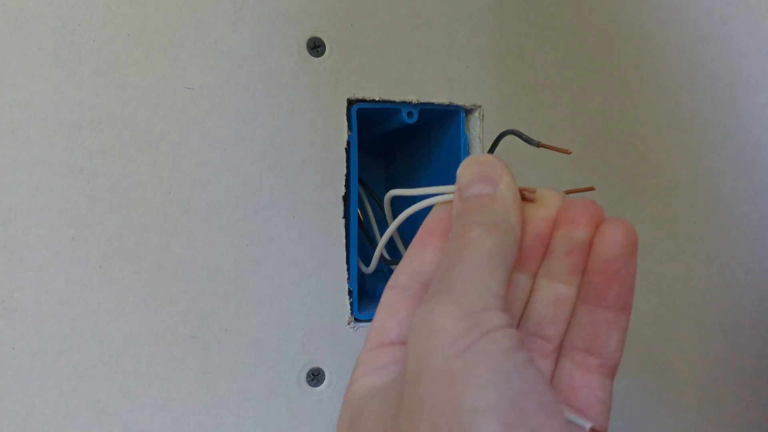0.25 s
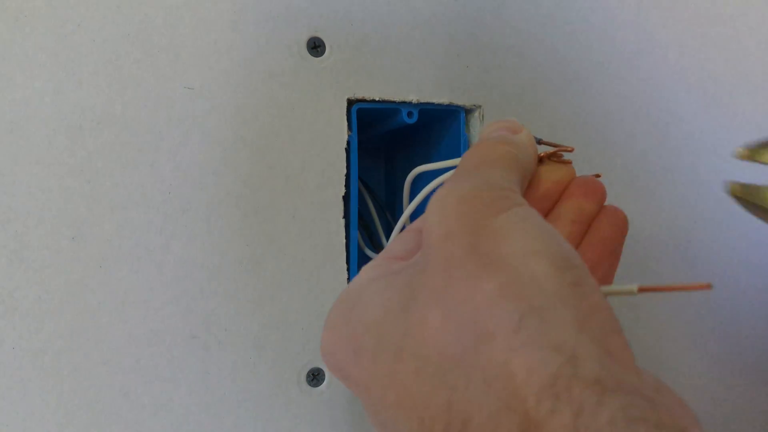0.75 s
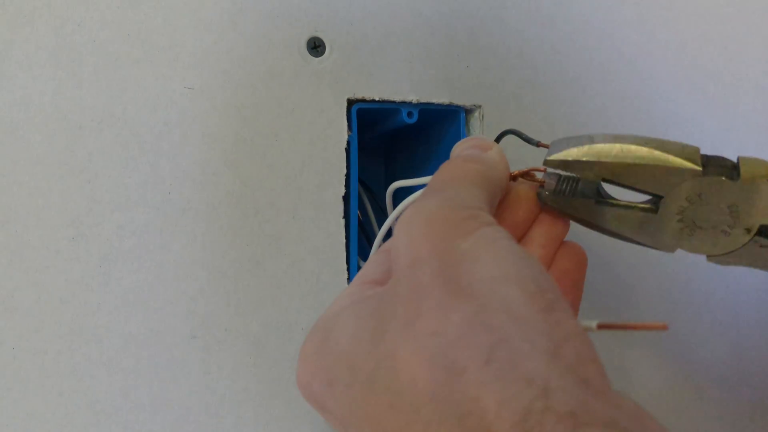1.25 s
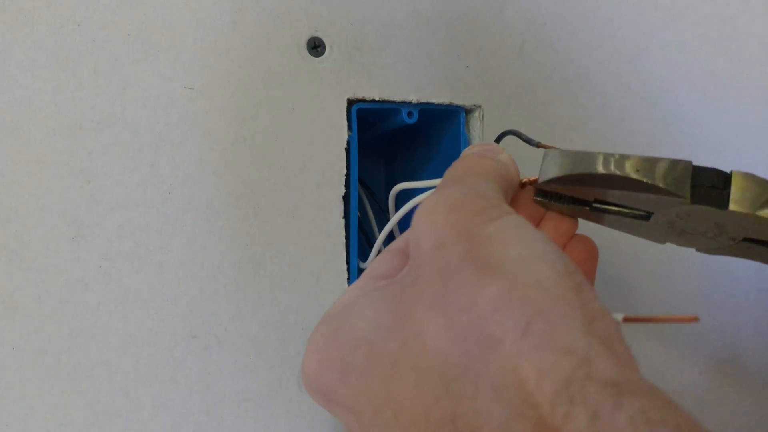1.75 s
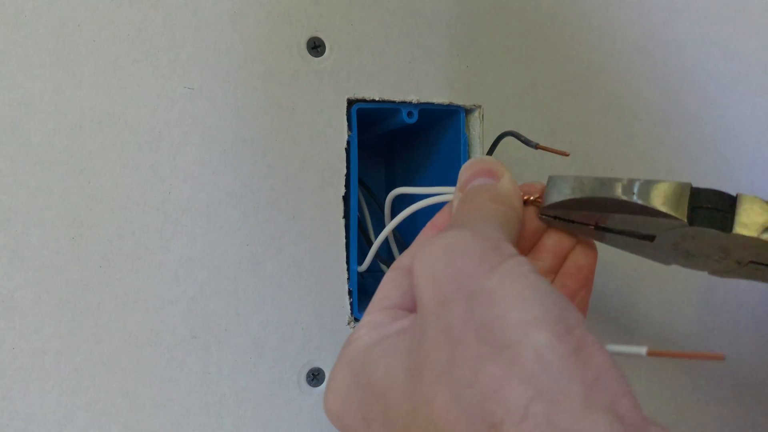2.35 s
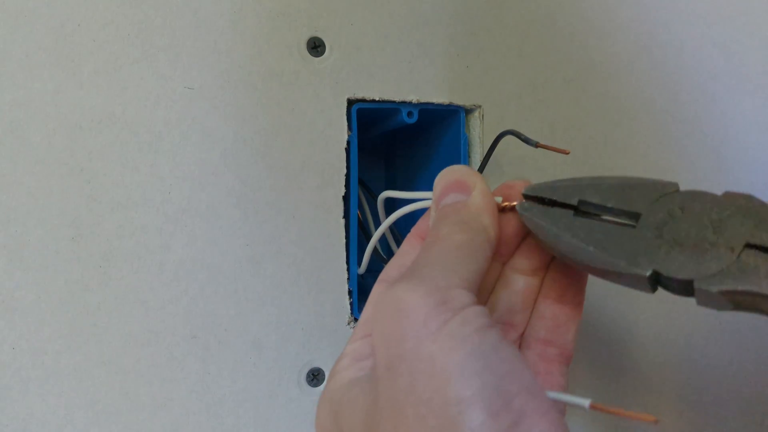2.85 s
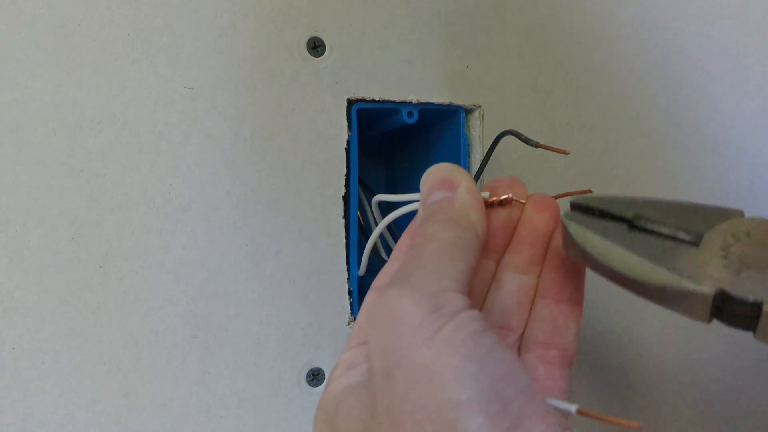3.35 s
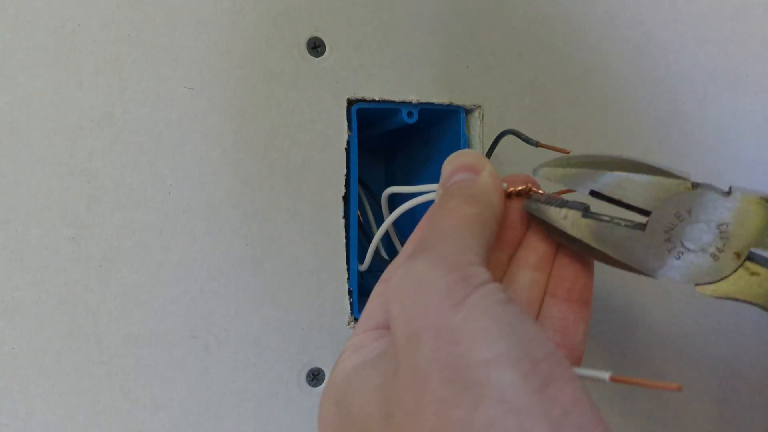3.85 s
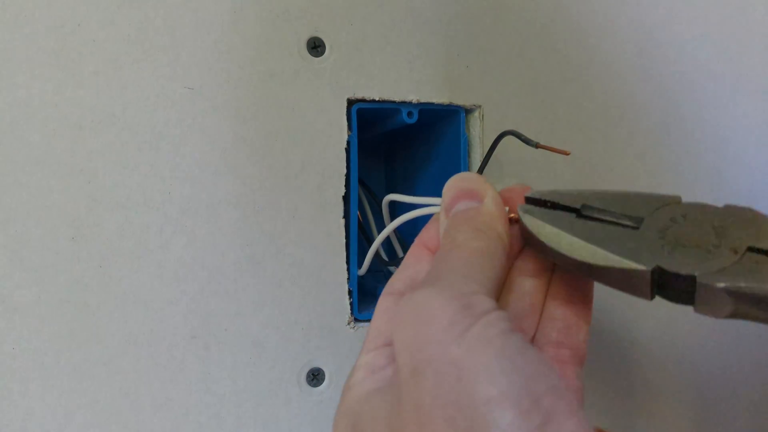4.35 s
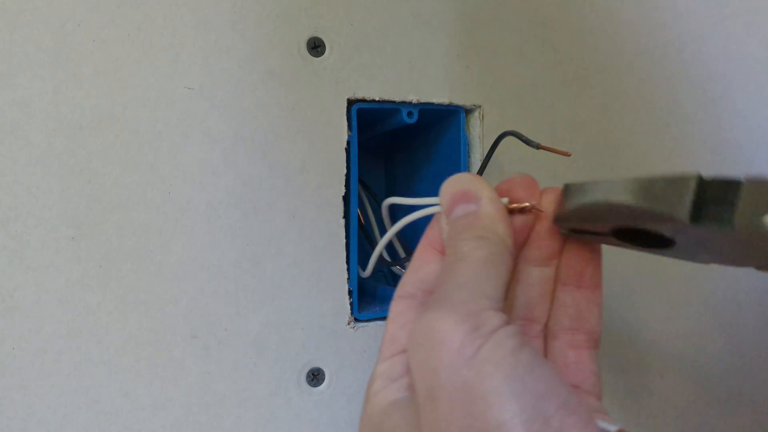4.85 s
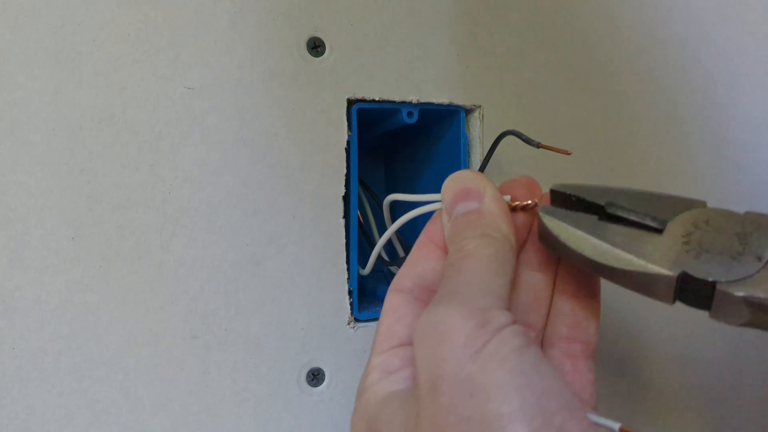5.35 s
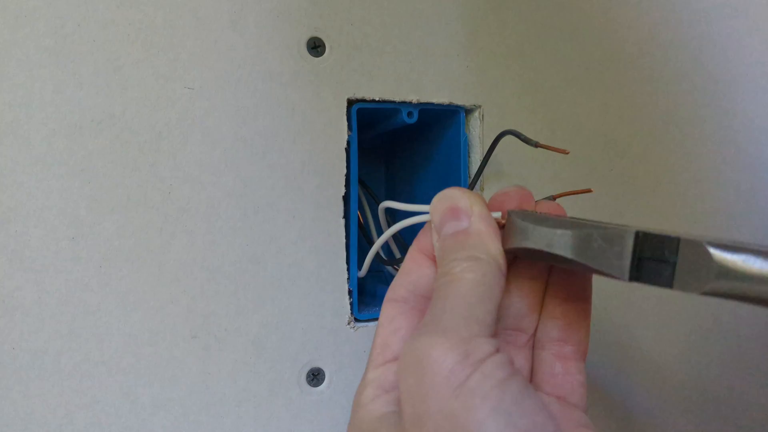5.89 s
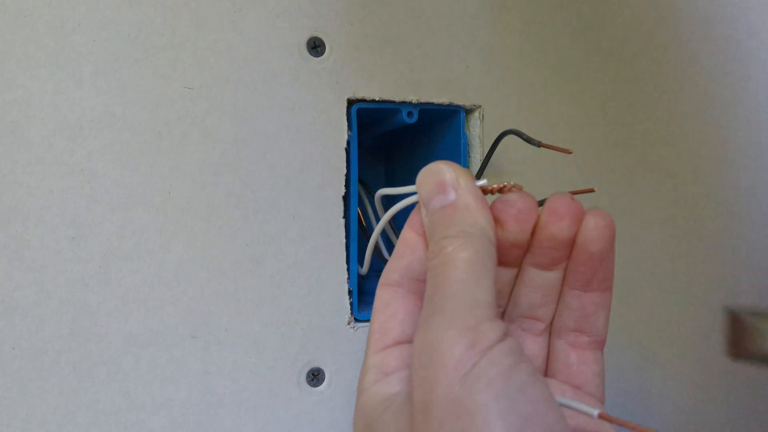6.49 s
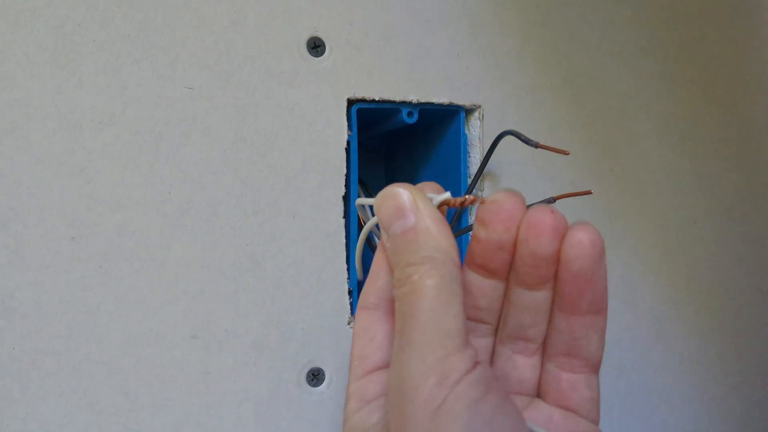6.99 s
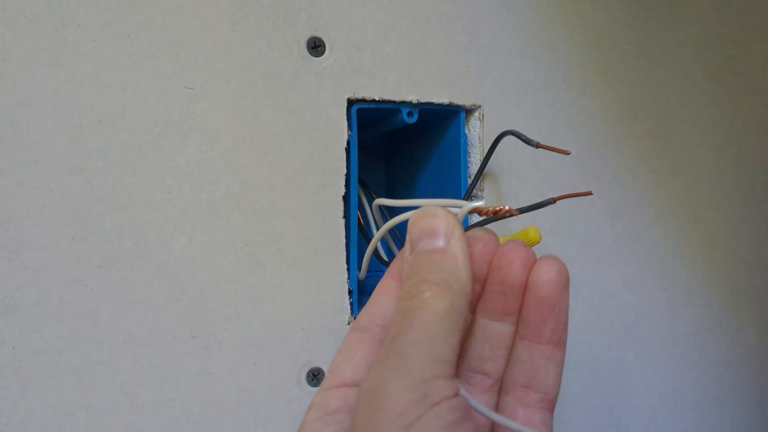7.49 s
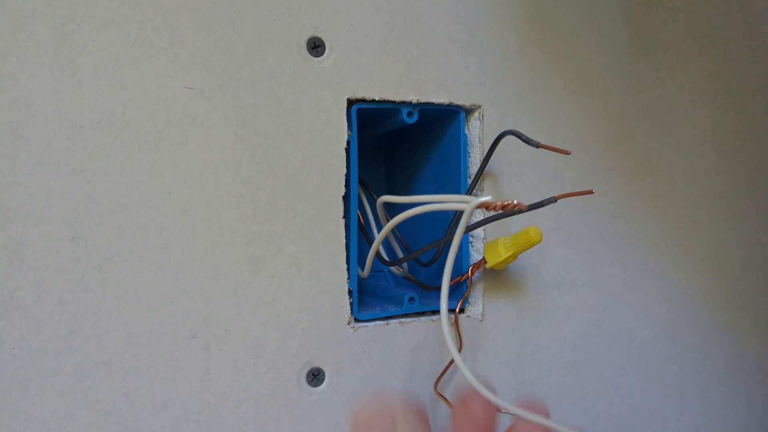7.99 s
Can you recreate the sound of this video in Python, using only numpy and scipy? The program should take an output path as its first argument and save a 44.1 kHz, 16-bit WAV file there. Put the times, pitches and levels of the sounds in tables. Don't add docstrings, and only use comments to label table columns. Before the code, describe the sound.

A quiet, bare room with soft hiss and low, lumpy rumble, heard close up in stereo with a short room tail. From 0 s hands settle with a light rub and a small click. Around 0.6-0.7 s pliers slip on wire with little cracks and a faint hollow box ring. Sparse ticks and creaks follow, with a firmer snap at 2.0 and a short slide at 2.3. At 3.05 a loud, sharp metallic clack jumps out. A steel clink comes at 3.6, small snaps near 4.1, a tight snap cluster at 4.9 and a clink at 5.2. Clicks thicken from 5.9, with a grating burst around 6.4. Skin swipes at 7.4; at 7.55 the tool knocks a wooden board, rocks, then lands harder and duller at 7.81, booming with bright steel jingle and bounces until about 8.0. A faint tick and rub end it.

```python
import sys
import numpy as np
from scipy import signal
from scipy.fft import rfft, irfft
from scipy.io import wavfile
from scipy.ndimage import uniform_filter1d

SR = 44100
rng = np.random.default_rng(int(sys.argv[2]) if len(sys.argv) > 2 else 0)


def wrap_up_sound(samples):
    columns = np.atleast_2d(samples).T
    tamed = np.clip(columns, -1, 1)
    steps = np.round(tamed * 32767).astype(np.int16)
    wavfile.write(sys.argv[1], SR, steps)


def volts_from_decibels(level):
    exponent = np.asarray(level, float) / 20
    return 10 ** exponent


N = 362937
LET_GO_S = 7.5


def evened(x):
    return x / np.sqrt(np.mean(x ** 2) + 1e-20)


def read(points, hz):
    f, value = np.transpose(points)
    return np.interp(np.log(hz + 1), np.log(f + 1), value)


def add(mix, s, sound):
    part = mix[:, round(s * SR):][:, :sound.shape[1]]
    part += sound[:, :part.shape[1]]


def swells(rows, t):
    s, length, db = np.transpose(rows)[:, :, None]
    return (db * np.cos(np.pi * np.clip((t - s) / length, -.5, .5)) ** 2).max(0)


def contact(length_s, rough):
    u = np.arange(1024) / SR / length_s
    if not rough:
        return u * np.exp(1 - u)
    push = (1 - np.exp(-6 * u)) * np.exp(-.6 * u)
    grit = push * rng.standard_normal(1024)
    for _ in range(3):
        z = rfft(grit)
        grit = irfft(z / abs(z)) * np.minimum(4 * push, 1)
    return grit


def strike(modes, spread, uneven_db, size, sense=-1):
    hz, db, t60 = np.transpose(modes)[:, :, None]
    detune, shade = rng.standard_normal((2, len(modes), 1))
    t = np.arange(size) / SR
    swing = sense ** np.arange(len(modes))[:, None]
    decay = volts_from_decibels(db + uneven_db * shade - 60 * t / t60)
    return (swing * decay * np.sin(2 * np.pi * hz * (1 + spread * detune) * t)).sum(0)


def ring(modes, force, spread, uneven_db, size=5000, sense=-1):
    out = signal.fftconvolve(strike(modes, spread, uneven_db, size, sense), force)[:size]
    out = out * np.minimum(np.arange(size, 0, -1) / (size / 4), 1)
    return out / abs(out).max()


def place(sound, pan_db, lead_s):
    hz = np.fft.rfftfreq(len(sound), 1 / SR)
    shading = read([(250, 0), (900, 1)], hz)
    scatter = rfft(rng.standard_normal(100) / 10, len(sound)) * [[1], [-1]]
    ports = volts_from_decibels(np.outer([pan_db / 2, -pan_db / 2], shading)) * (1 + .75 * shading * scatter)
    delays_s = [0, lead_s * rng.uniform(.5, 1.5)]
    ports = ports * np.exp(-2j * np.pi * np.outer(delays_s, hz))
    fade = np.clip(np.arange(len(sound), 0, -1) / 200 - 1, 0, 1)
    return irfft(rfft(sound) * ports, len(sound)) * fade


def stroke(start, length, db, rise, start_db, fade_db, *relative_db):
    corners = ((0, start_db), (rise, 0), (1, fade_db))
    return [(start + u * length, db + d, *relative_db) for u, d in corners]


def chatter(rows, bodies, per_s, pan_db):
    s, db, *relative = np.transpose(rows)
    t = np.arange(s[0], s[-1], 1 / SR)
    noise = rng.standard_normal(len(t))
    hits = rng.random(len(t)) < per_s / SR
    grains = noise * (.5 + hits * volts_from_decibels(3.5 * np.minimum(rng.exponential(1, len(t)), 3)))
    out = 0
    for modes, body_db in zip(bodies, [db] + [db + r for r in relative]):
        answer = strike(modes, 0, 1.0, size=5000)
        drive = evened(grains) * volts_from_decibels(np.interp(t, s, body_db)) * signal.windows.tukey(len(t), .1)
        out = out + signal.fftconvolve(drive, answer / np.linalg.norm(answer))
    return s[0], place(out, pan_db, .00008)


# (pitch [Hz], likeness [0-1])
SAME = [(60, 1), (180, 0.57), (550, 0.47), (1650, 0), (15000, 0)]


def diffuse(frames, size):
    a, b, c, d = rng.standard_normal((frames, size // 2 + 1, 4)).T
    same = np.clip(read(SAME, np.fft.rfftfreq(size, 1 / SR)), -1, 1)[:, None]
    left = a + 1j * b
    return np.array([left, same * left + np.sqrt(1 - same ** 2) * (c + 1j * d)])


# (pitch [Hz], t60 [s])
ROOM = [(60, 0.12), (200, 0.357), (700, 0.46), (2000, 0.36), (5000, 0.5), (10000, 0.33), (16000, 0.27)]
# (pitch [Hz], level [dB])
ROOM_DB = [(60, -39), (200, -2.5), (700, -6), (2000, -9), (3400, -6.5), (5000, -7.5), (16000, -8.5)]


def room():
    hz, t = np.fft.rfftfreq(256, 1 / SR)[:, None], np.arange(420) * 64 / SR
    shape = volts_from_decibels(-60 * t / read(ROOM, hz)) * np.clip((t - .005) / 0.0042, 0, 1)
    shape = shape * volts_from_decibels(read(ROOM_DB, hz)) / np.linalg.norm(shape, axis=1, keepdims=True)
    noise = signal.istft(diffuse(420, 256), nperseg=256, noverlap=192)[1]
    z = signal.stft(evened(noise) / 8, nperseg=256, noverlap=192)[2][:, :, :420]
    return signal.istft(z * shape, nperseg=256, noverlap=192)[1]


# (pitch [Hz], level [dB per Hz])
FLOOR = [(16, -68), (28, -63), (81, 1), (145, -8), (205, -12.5), (359, -18), (399, -12.5), (520, -16.5),
         (775, -19), (1220, -21), (1720, -23), (2770, -24), (3520, -26), (4590, -26.5), (16000, -32)]
# (pitch [Hz], rms level [dB])
WHINE = [(4495, -90.5), (8995, -94.5)]
# (middle [s], length [s], rumble lift [dB])
HEAVES = [(0.7, 0.33, 22), (1.55, 0.18, 13.5), (2.2, 0.62, 16), (2.36, 0.6, 15), (2.7, 0.92, 4.5),
          (3.17, 0.48, 18), (4.0, 0.164, 13), (4.3, 0.96, 7), (4.96, 0.65, 10.5), (5.72, 0.26, 6),
          (6.3, 1, 10), (6.64, 0.54, 10.5), (6.98, .3, 10)]
# (middle [s], length [s], hiss lift [dB])
RUBS = [
    (0.02, 0.96, 4.5),
    (2.98, .3, 2.5),
    (3.45, 0.225, 2),
    (4.93, 0.72, 5),
    (6.3, 0.27, 4.5),
    (6.86, 0.11, 11),
    (7.11, .1, 4),
    (7.365, 0.13, 16),
    (7.4, .26, 10),
    (8.23, 0.34, 6),
]
# (time [s], lift [dB], hold [s])
SHUDDERS = [
    (7.592, 23.5, 0.078),
    (7.822, 39, 0.086),
]


def background():
    frames, hz = N // 256 + 8, np.fft.rfftfreq(1024, 1 / SR)
    t = np.arange(frames) * 256 / SR
    heave, rub = swells(HEAVES, t) - 5, swells(RUBS, t)
    s, lift_db, hold = np.transpose(SHUDDERS)[:, :, None]
    rise = np.clip(1 + (t - s) / 0.029, 0, 1)
    fall_db = 143.5 * np.maximum(t - s - hold, 0)
    shudder = np.maximum(lift_db * rise - fall_db, 0).max(0)
    rumble, scuff = heave + .8 * shudder, 0.27 * heave + shudder
    low = read([(180, 0.54), (300, 0.0253)], hz)[:, None]
    middle = read([(180, 0.069), (300, 1), (1500, 0.73), (4000, 0.18)], hz)[:, None]
    high = read([(150, .1), (500, .45), (1800, 0.48), (4000, 0.395), (9000, 0.853), (16000, 0.92)], hz)[:, None]
    patches = uniform_filter1d(rng.standard_normal((frames, 513)).T, 3, 0)
    patches = evened(uniform_filter1d(patches, 9, 1))
    z = diffuse(frames, 1024) * volts_from_decibels(read(FLOOR, hz)[:, None])
    level = volts_from_decibels(-66.5) / np.std(signal.istft(z, nperseg=1024, noverlap=768)[1])
    lumps = (1.73 + 0.83 * low) * patches
    z = z * volts_from_decibels(low * rumble + middle * scuff + high * rub + lumps)
    seconds = np.arange(N) / SR
    whine = sum(volts_from_decibels(db) * np.sqrt(2) * np.sin(2 * np.pi * f * seconds) for f, db in WHINE)
    return level * signal.istft(z, nperseg=1024, noverlap=768)[1][:, :N] + whine


# (pitch [Hz], level [dB], t60 [s])
CRACK = [(960, -1.5, 0.0094), (1228, 0.5, 0.012), (1780, 3.5, 0.0026), (2550, -6, 0.0098),
         (2793, -1, 0.0054), (3420, -0.5, 0.0035), (4150, -2, 0.0009), (2360, -12.5, 0.033),
         (3315, -21, 0.063)]
# (pitch [Hz], level [dB], t60 [s])
TICK = [(5220, 0.3, 0.0017), (6290, -1, 0.0024), (6700, -5, 0.0046), (7820, -2.8, 0.00396),
        (8900, 2.5, 0.00078), (11350, -1, 0.0017), (12620, 1.5, 0.00097), (15200, -5.5, 0.0011)]
# (pitch [Hz], level [dB], t60 [s])
BOX = [(510, -13, .03), (690, -1, .03), (712, -9.5, .065), (880, -7, .015), (1200, -4, .022)]
# (pitch [Hz], level [dB], t60 [s])
WALL = [(67.8, -11, 0.79), (106, -3, 0.095), (158.6, 0, 0.16), (232.6, 0.5, 0.092), (307.3, 3, 0.04),
        (388.2, 2, 0.13)]


def slip(db, tick_db, box_db, wall_db, contact_ms):
    grit = contact(contact_ms / 1000, rough=True)
    air = ring(CRACK, grit, .02, 1.0) + volts_from_decibels(tick_db) * ring(TICK, grit, .02, 1.0)
    box = volts_from_decibels(box_db) * ring(BOX, grit, .012, 1.0)
    wall = volts_from_decibels(min(wall_db, 7)) * ring(WALL, contact(.0006, rough=False), .03, 2.0)
    return volts_from_decibels(db) * place(air + box + wall, 0.41, .00009)


# (time [s], crack peak [dB], relative wall thump [dB])
TICKS = [(0.0144, -56, -20), (0.4374, -60.5, -26), (0.4647, -63, -11), (1.72, -63, -17),
         (1.8603, -61.5, -5), (2.0836, -56.5, 0.5), (2.7274, -65, -6.5), (4.569, -54.5, 0), (4.726, -57, 7),
         (4.8217, -53, 2.5), (4.8636, -54, -16), (5.5763, -52.5, -17), (5.7188, -57.5, -3.5),
         (6.0094, -63.5, 6), (6.045, -61, 3.5), (6.3064, -57, -7.5)]
# (time [s], crack peak [dB], then relative: tick [dB], box [dB], wall [dB])
SNAPS = [(0.0501, -38, -37.5, -6.5, -43.5), (0.597, -53, -4, 1.5, -35), (0.6594, -57.5, -1, 13, 2),
         (0.7171, -50, -5, 1.5, -13), (1.3437, -58, -4, -1, -6.5), (2.0284, -34, -23, -8.5, -37.5),
         (2.1251, -47.5, -7, -22, -5.5), (3.0471, -17.5, -4, -5.5, -12), (3.251, -50, -9, -28.5, -30),
         (3.9227, -49, -5, -4.5, -8), (4.151, -40, -25, -9, -13), (4.1576, -43, -3, -4, -43),
         (4.9189, -28, -10.5, -1, -22), (4.9316, -35, -13.5, -9, -6), (4.9789, -29, -18.5, -10, -15),
         (5.9297, -37, -30.5, -10.5, -41), (6.0834, -46.5, -32, -11.5, -5.5),
         (6.1572, -33.5, -12.5, -4.5, -13.5), (6.3579, -41, -0.5, 1, -26.5), (6.3679, -40, 1.5, 0, -3),
         (6.3879, -38, -11, -4, -2), (6.4071, -43, -19.5, -4, 0), (6.6478, -45, 0.5, -3, -26),
         (6.6776, -40, -27, -11, -18)]
# (time [s], crack peak [dB], then relative: box [dB], wall [dB])
CREAKS = [(0.1027, -55, 3, 0.5), (0.6464, -52, 1, -16), (1.1675, -70, -26, -25), (1.4963, -62, 1.5, -21),
          (1.5489, -57, -2, 2), (1.9106, -56.5, 2.5, -24), (2.1846, -58, 1.5, -1), (2.2492, -60.5, 2.5, -4),
          (2.3476, -65, -15, -17), (2.5194, -66, 5, 7), (2.8494, -78, 16, -0.5), (2.9131, -58.5, -14, -2),
          (3.2424, -56, -28.5, -21), (3.7038, -66.5, -8.5, -10), (4.0882, -56, -1.5, -12),
          (4.6981, -70, 11, -10), (4.906, -51.5, 8, -20.5), (5.69, -63, -2, -18), (6.325, -64, -12, 1.5),
          (6.55, -56, -11.5, -26), (6.5903, -55.5, -11, -15), (6.6323, -53, -14, -31),
          (6.8538, -59, 3, -10), (7.002, -57, -23.5, -23)]
# (time [s], crack peak [dB], then relative: tick [dB], box [dB], wall [dB])
EDGES = [
    (7.5474, -32, -11.5, -8, 7),
    (7.5674, -39, -21, -6, 7),
    (7.6097, -48.5, 0.5, -14, 4),
    (7.623, -42, -25, -9, -8),
    (7.8129, -37.5, 0, -13, 8),
    (7.8244, -31.5, 6, 1.5, 7),
    (7.8505, -40, 6, 1, -14),
    (8.0804, -57, 2, 9, -10),
]


def slips():
    ticks = [(s, db, 3.5, -6, wall_db, 0.88) for s, db, wall_db in TICKS]
    snaps = [(*row, 1.19) for row in SNAPS]
    creaks = [(s, db, -8, *rest, 1.219) for s, db, *rest in CREAKS]
    edges = [(*row, 1.15) for row in EDGES]
    return sorted(snaps + edges + ticks + creaks)


# (pitch [Hz], level [dB], t60 [s])
SCRAP = [(1250, -1, .008), (1550, -1, .006), (1880, 1, .008), (2100, -3, .006), (2700, -3, .006),
         (3300, -8, .004), (4400, -12, .002)]
# (start [s], length [s], level [dB], then relative: fine hiss [dB], box ring [dB])
SCRAPES = [(0.597, .03, -65, -16, 1), (0.72, .03, -66, -16, 1), (1.344, .02, -72, -16, 3),
           (1.496, .02, -73, -16, 3), (3.241, .024, -59, -10, -6), (7.515, .035, -66, -6, -12),
           (7.846, .035, -54, 8, -10), (3.924, .045, -66, -14, 4), (5.933, .06, -64, -16, 0),
           (5.72, .03, -73, -14, 4), (4.09, .04, -73, -14, 3)]


def scrape(*row):
    return drag(*row, grain=SCRAP)


# (start [s], length [s], level [dB], then relative: fine hiss [dB], box ring [dB])
DRAGS = [
    (0.642, 0.096, -64.5, -14, 3.5),
    (1.82, 0.143, -75.5, -9, 5),
    (2.336, 0.095, -56.5, -10.5, -2),
    (4.809, 0.081, -77, 6, 4),
    (5.601, 0.107, -75, -3, 5),
    (6.36, 0.0677, -45.5, -4.5, 1),
    (6.624, 0.065, -65, -18.5, 10.5),
]


def drag(s, length, db, hiss_db, box_db, grain=CRACK):
    rows = stroke(s, length, db, 0.27, -6, -19.5, hiss_db, box_db, -4)
    return chatter(rows, (grain, TICK, BOX, WALL), 1500, 0.67)


# (time [s], peak [dB], build-up [s], pitch [Hz], t60 [s])
HUMS = [(0.648, -52, .012, 720, .05), (6.365, -35.5, .014, 705, .07), (6.633, -52, .015, 705, .12),
        (2.03, -56, .008, 696, .07), (4.92, -46, .008, 700, .08), (1.346, -58, .006, 720, .04),
        (1.498, -60, .005, 720, .04), (1.3455, -62, .002, 1750, .015), (1.166, -60, .003, 2750, .015),
        (1.547, -66, .003, 2650, .03), (3.05, -39, .004, 510, .25), (3.252, -53, .003, 1300, .02),
        (3.246, -60, .006, 5200, .02), (3.645, -62, .003, 2770, .3), (4.156, -68, .003, 2360, .3),
        (4.165, -59, .008, 500, .3), (5.1905, -57, .002, 5100, .008), (5.691, -52, .001, 4500, .005),
        (6.39, -43, .012, 170, .2), (7.55, -34, .004, 554, .15), (7.83, -29, .004, 575, .12),
        (8.082, -60, .003, 6800, .012), (8.083, -58, .003, 1350, .03), (3.048, -28, .001, 3250, .005),
        (3.0485, -40, .0007, 7000, .003), (0.797, -59, .001, 5100, .006), (3.64, -53, .001, 5300, .005),
        (4.92, -44, .001, 3350, .008), (0.598, -55, .002, 1100, .03), (0.719, -54, .002, 1100, .03),
        (0.664, -51, .012, 150, .25), (6.389, -46, .002, 3500, .012), (6.368, -48, .002, 5000, .012),
        (6.408, -52, .002, 3400, .012), (5.195, -63, .003, 2730, .25), (4.158, -51, .004, 620, .04),
        (4.17, -58, .006, 410, .2), (3.049, -34, .004, 300, .08)]


def hum(db, build_s, hz, t60):
    t = np.arange(700) / SR
    force = np.sin(2 * np.pi * hz * t) * (t < build_s)
    return volts_from_decibels(db) * place(ring([(hz, 0, t60)], force, 0, 0), 1.0, .00009)


# (pitch [Hz], level [dB], t60 [s])
STEEL_LOW = [(2717.7, -1, 0.12), (2730, -2, 0.017), (3350, -6, 0.003), (2100, -13, 0.0041)]
# (pitch [Hz], level [dB], t60 [s])
STEEL_HIGH = [(4953, -24, .08), (5044, -26, .09), (5125, -24, .07), (5290, -26, .06), (7745, -31, .08),
              (5100, 0, .007), (4600, -6, .005), (5700, -5, .004), (6300, -6, .004), (7500, -3, .004),
              (8600, -5, .002), (10500, -4, .002)]
# (time [s], peak [dB], relative upper modes [dB], left-right [dB], lowest mode [Hz])
CLINKS = [
    (0.7960, -54, -5, 5.5, 2730),
    (3.6391, -44.5, -7.5, -10, 2780),
    (5.1896, -43, -6, -5, 2710),
    (6.7351, -53, -4, -5, 2360),
    (7.8241, -35, 1, -2.5, 2710),
    (7.8521, -39, -1, -11, 2703),
]


def clink(db, upper_db, pan_db, hz, lines_db):
    grit = contact(0.001313, rough=True)
    low, upper = np.array(STEEL_LOW) * [hz / STEEL_LOW[0][0], 1, 1], np.array(STEEL_HIGH)
    low[:1, 1] += lines_db + 2.5
    upper[:5, 1] += lines_db
    steel = ring(low, grit, 0, 0, size=9000) + volts_from_decibels(upper_db) * ring(upper, grit, 0, 0.39, size=9000)
    return volts_from_decibels(db) * place(steel, pan_db, .00007)


# (pitch [Hz], level [dB], t60 [s])
JAW = [(1380, -1, .006), (2920, 1, .005), (3250, -2, .006), (3700, -6, .004), (4400, -5, .003),
       (5500, -7, .003), (6530, -7, .004), (7300, -7, .002), (9500, -6, .0015), (13000, -5, .001)]
# (time [s], peak [dB])
CLAPS = [
    (3.0478, -21),
    (3.2295, -58),
    (6.1578, -45),
    (4.9195, -42),
    (6.3895, -44),
    (6.369, -43),
]


def clap(db):
    return volts_from_decibels(db) * place(ring(JAW, contact(.0007, rough=True), 0, 0, size=2000), -1.5, .00009)


# (pitch [Hz], level [dB], t60 [s])
BOARD_LOW = [(85.6, -27, 0.18), (118, -9, 0.174), (158, -2, .1), (181, -2, 0.28), (219, -1, 0.19),
             (302, 17.5, 0.042), (378, 6, 0.2)]
# (pitch [Hz], level [dB], t60 [s])
BOARD_HIGH = [(443, -7.5, 0.085), (482, -14, 0.2), (525, -9, 0.11), (598, -12, 0.14), (629, -10, 0.2),
              (721, -18, 0.15), (800, -24, 0.2)]
# (time [s], peak [dB], brightness [dB], left-right [dB])
KNOCKS = [
    (7.548, -9.5, 8, -2.5),
    (7.566, -33.5, 19.5, -17),
    (7.612, -23.5, 4, 13.5),
    (7.813, -3.5, -20, 2.5),
    (7.823, -17.5, 15.5, 8),
    (7.846, -13, 12, -1),
    (7.869, -17, 6, -8),
    (7.884, -25.5, 20.5, 4),
    (7.916, -18.5, 11.5, 2),
]


def knock(db, bright_db, pan_db):
    blow = contact(0.00023, rough=False)
    low = ring(BOARD_LOW, blow, .004, 1.0, size=14000, sense=1)
    upper = ring(BOARD_HIGH, blow, .004, 1.0, size=14000, sense=1)
    return volts_from_decibels(db - 2.8) * place(low + volts_from_decibels(bright_db - 10.5) * upper, pan_db, 0.000321)


# (time [s], peak [dB], build-up [s], pitch [Hz], t60 [s])
ROCKS = [(7.56, -36, .006, 220, .2), (7.555, -30, .004, 380, .15), (7.5475, -19, .004, 300, .06),
         (7.5477, -22, .003, 460, .06), (7.56, -30, .008, 150, .12), (7.65, -41, .01, 553, .12),
         (7.58, -34, .004, 630, .15), (7.553, -36, .003, 725, .12), (7.815, -23, .008, 118, .22),
         (7.855, -28, .01, 179, .14), (7.865, -31, .01, 629, .2), (7.87, -29, .008, 378, .18),
         (7.93, -33, .008, 331, .15), (7.84, -29, .006, 484, .18), (7.823, -37, .003, 930, .08),
         (7.574, -38, .003, 810, .1), (7.852, -42, .002, 5044, .15), (7.845, -45, .002, 4954, .15),
         (7.885, -44, .002, 5115, .12), (7.91, -46, .002, 5180, .1), (7.8125, -17, .004, 299, .08),
         (7.895, -50, .003, 2703, .3), (7.96, -55, .003, 2703, .3), (7.853, -50, .002, 7745, .15)]


def rock(*controls):
    return hum(*controls)


def shake():
    return chatter(stroke(7.55, 0.161, -49.5, 0.039, 3, -20), (SCRAP,), 1200, 1.6)


# (pitch [Hz], level [dB], t60 [s])
JINGLE = [(1800, -12, .003), (2300, -14, .003), (3300, -11, .003), (4300, -6, .003), (4750, -2, .004),
          (5400, 0, .004), (6000, -2, .003), (6700, -3, .003), (7500, -1, .003), (8400, -2, .002),
          (9600, -1, .0015), (11300, -3, .0015), (13500, -6, .001)]


def rattle():
    rows = stroke(7.82, 0.19, -53, 0.25, -1.5, -27, 0, 4)
    return chatter(rows, (STEEL_LOW[:1], STEEL_HIGH, JINGLE), 3800, 0.46)


# (time [s], peak [dB], relative upper modes [dB], left-right [dB], lowest mode [Hz])
BOUNCES = [
    (7.845, -48, 6, -5, 2703),
    (7.857, -43, 4, -5, 2703),
    (7.87, -47, 4, -5, 2703),
    (7.8842, -46, 7, -5, 2703),
    (7.8905, -48, 7, -5, 2703),
    (7.9096, -48, 7, -5, 2703),
]


def bounce(*controls):
    return clink(*controls, lines_db=-3)


def scene():
    paths, close = np.zeros((3, 2, N)), np.zeros((2, N))

    def shielded(path, s, sound):
        share = volts_from_decibels(-8) if s < LET_GO_S else 1
        add(path, s, share * sound)
        add(close, s, (1 - share) * sound)

    floor = background()
    clinks = [(*row, -28 if row[0] < LET_GO_S else -3) for row in CLINKS]
    turns = ((slips(), slip, add), (clinks, clink, shielded), (KNOCKS, knock, add), (BOUNCES, bounce, add))
    for rows, source, mix_in in turns:
        for k, (s, *controls) in enumerate(rows):
            mix_in(paths[k % 3], s, source(*controls))
    for rows, source, mix_in in ((HUMS, hum, shielded), (CLAPS, clap, add), (ROCKS, rock, shielded)):
        for s, *controls in rows:
            mix_in(paths[1], s, source(*controls))
    for row in SCRAPES:
        add(paths[2], *scrape(*row))
    for row in DRAGS:
        add(paths[0], *drag(*row))
    add(paths[2], *shake())
    add(paths[1], *rattle())
    near = close + paths.sum(0)
    for path in paths:
        near = near + signal.fftconvolve(path, room(), axes=1)[:, :N]
    panel = signal.butter(4, 80, "high", fs=SR, output="sos")
    return signal.sosfilt(panel, near) + floor


def top_cut(x):
    return signal.sosfilt(signal.butter(12, 15985, fs=SR, output="sos"), x)


def record(dry):
    edge = signal.firwin(255, 16400, window=("kaiser", 9), fs=SR)
    mix = signal.oaconvolve(dry, edge[None], "same", axes=1)
    return top_cut(mix)


dry = scene()
out = record(dry)
wrap_up_sound(out)
```